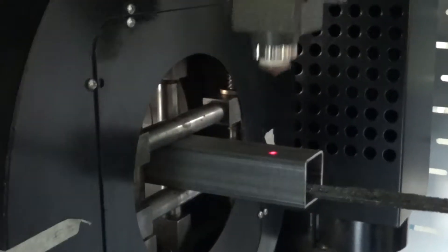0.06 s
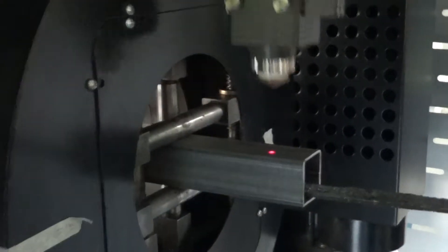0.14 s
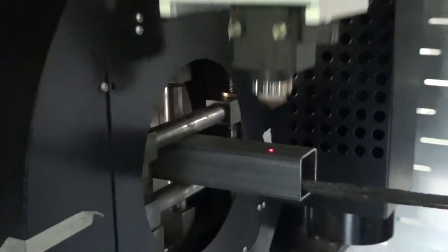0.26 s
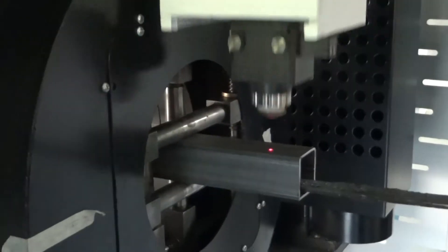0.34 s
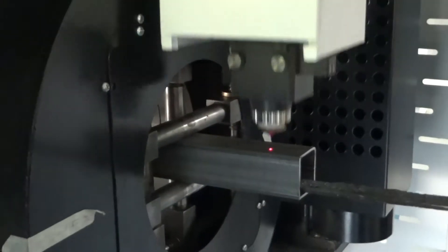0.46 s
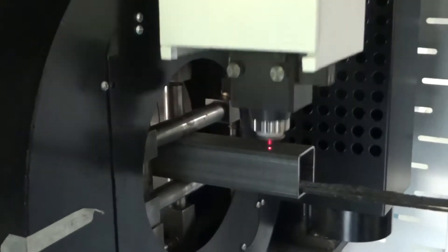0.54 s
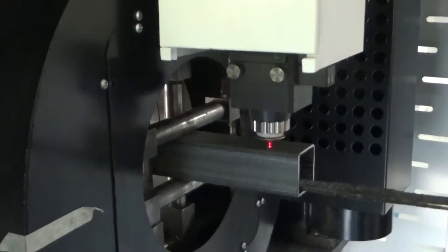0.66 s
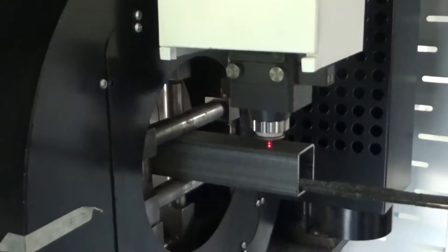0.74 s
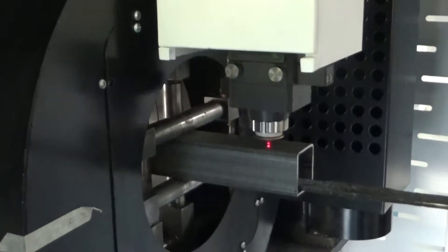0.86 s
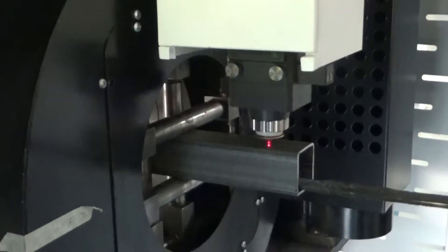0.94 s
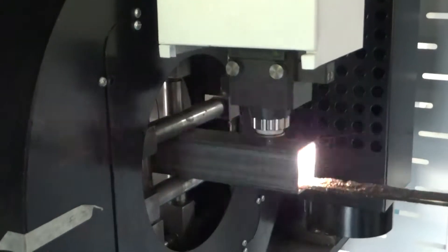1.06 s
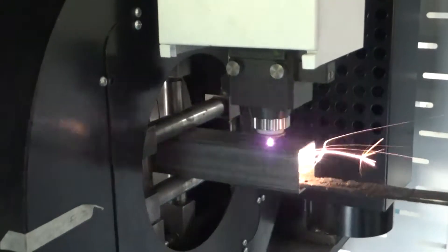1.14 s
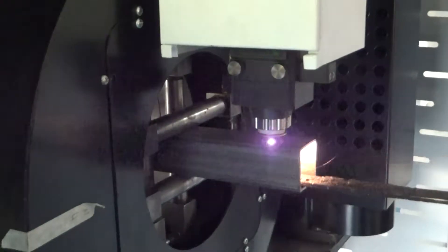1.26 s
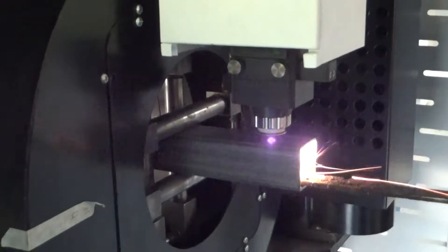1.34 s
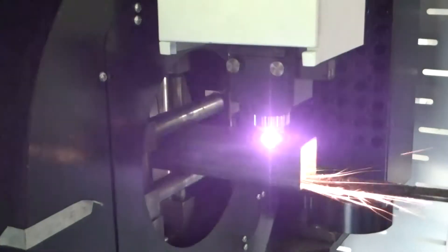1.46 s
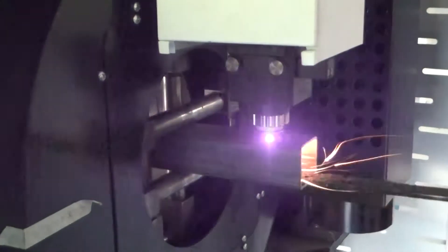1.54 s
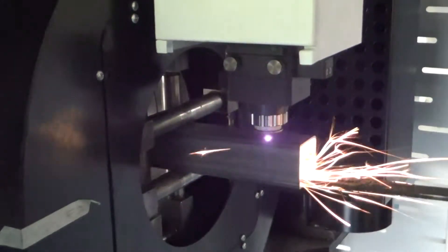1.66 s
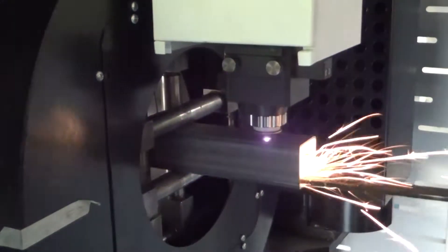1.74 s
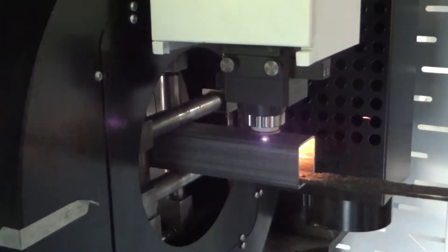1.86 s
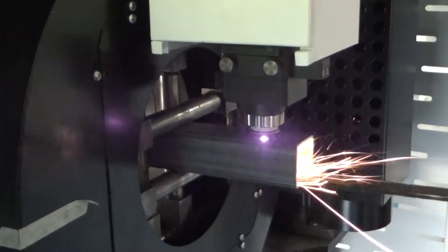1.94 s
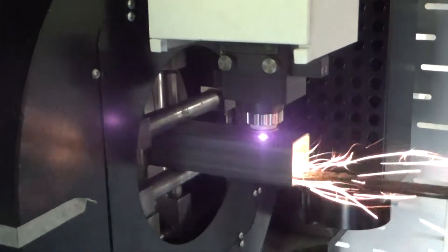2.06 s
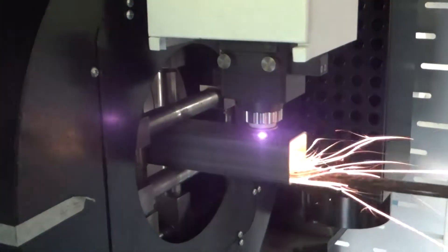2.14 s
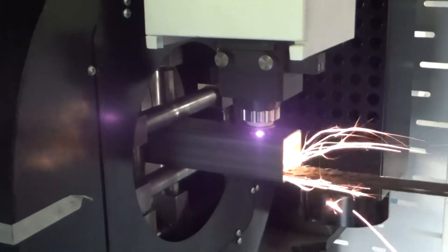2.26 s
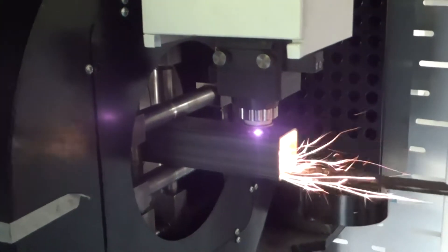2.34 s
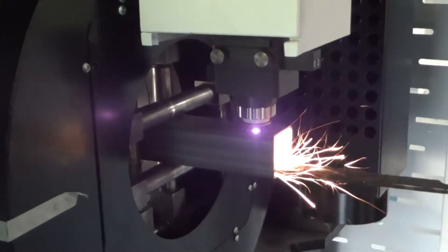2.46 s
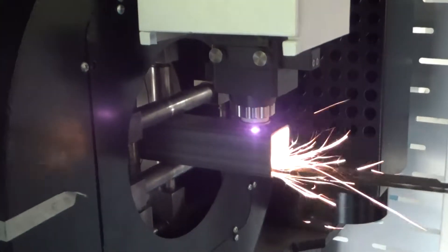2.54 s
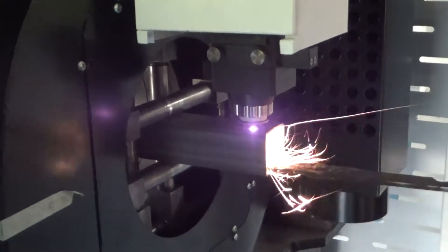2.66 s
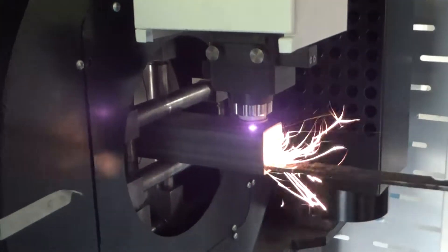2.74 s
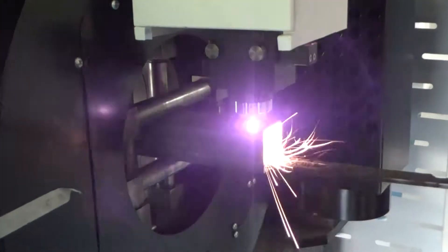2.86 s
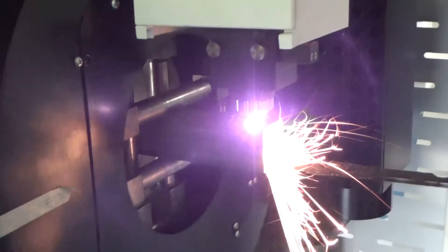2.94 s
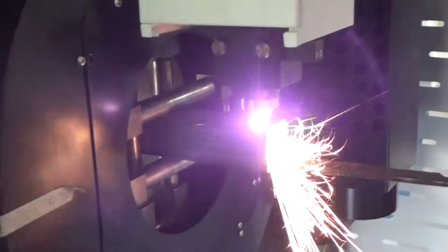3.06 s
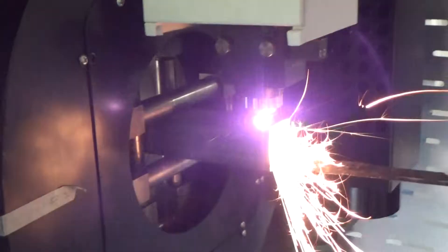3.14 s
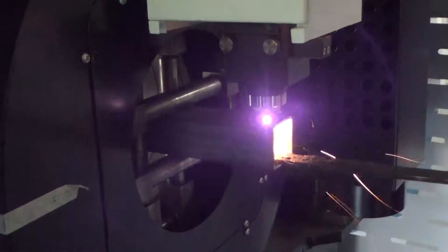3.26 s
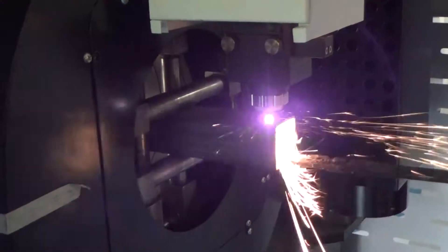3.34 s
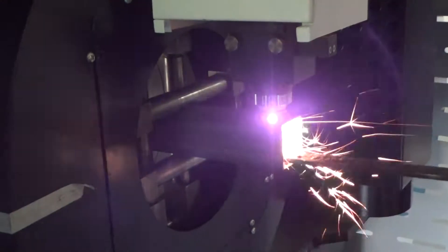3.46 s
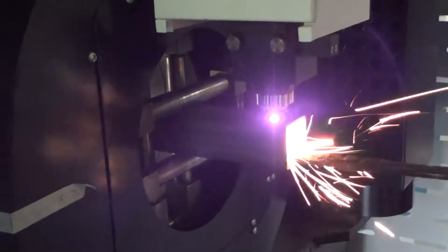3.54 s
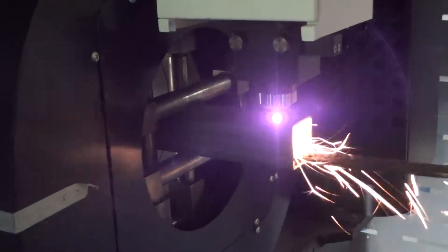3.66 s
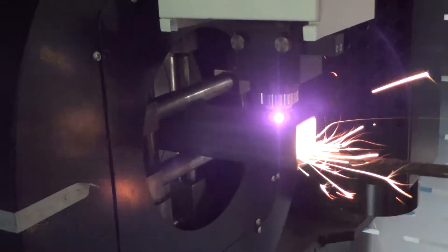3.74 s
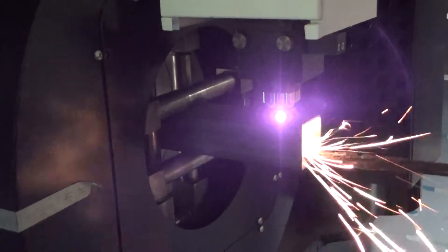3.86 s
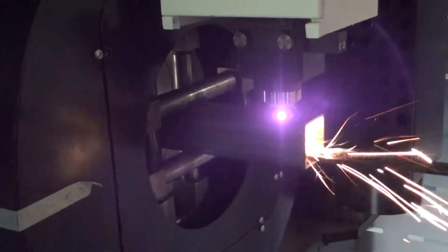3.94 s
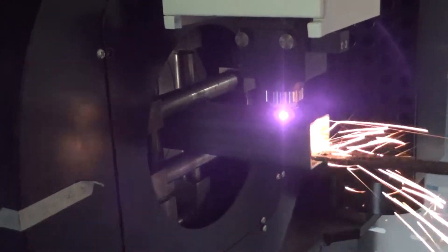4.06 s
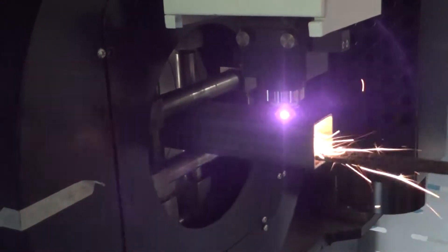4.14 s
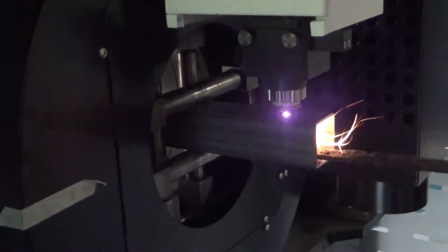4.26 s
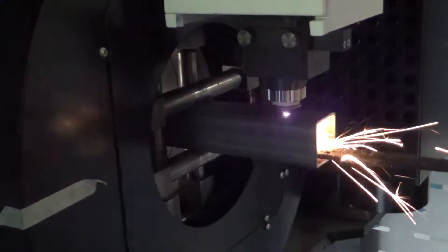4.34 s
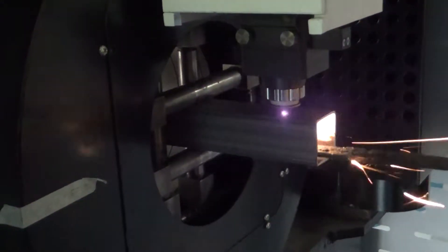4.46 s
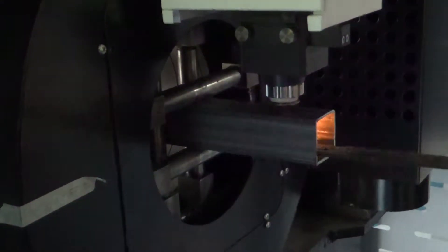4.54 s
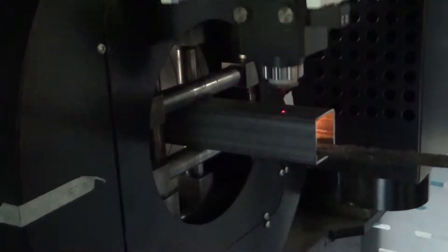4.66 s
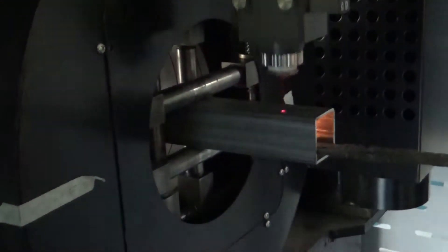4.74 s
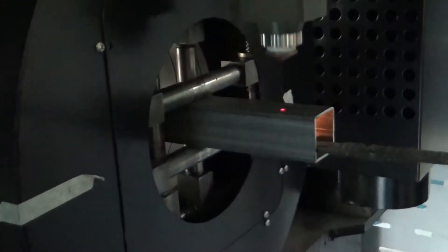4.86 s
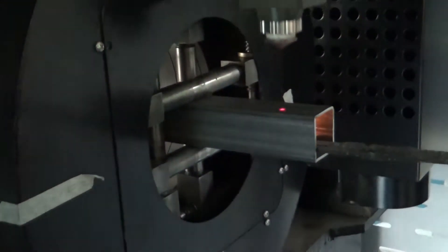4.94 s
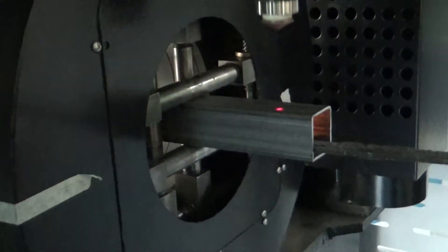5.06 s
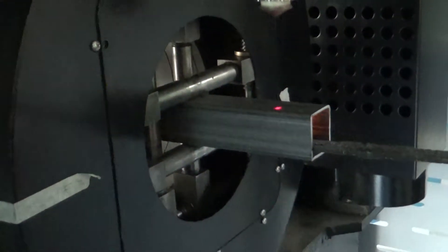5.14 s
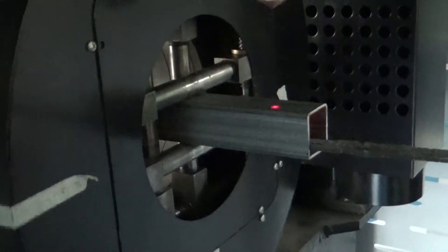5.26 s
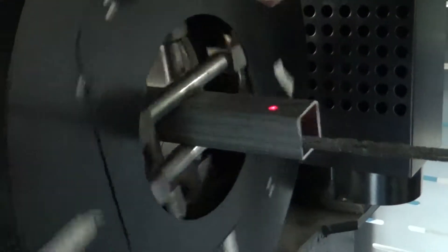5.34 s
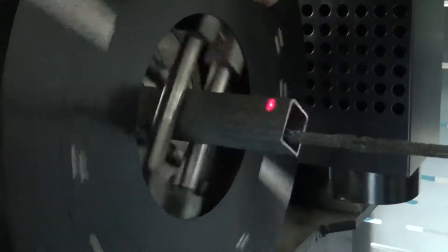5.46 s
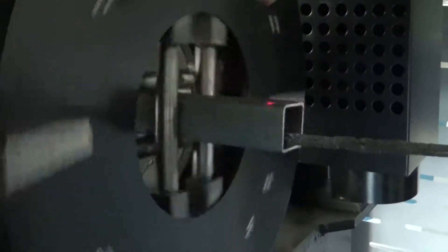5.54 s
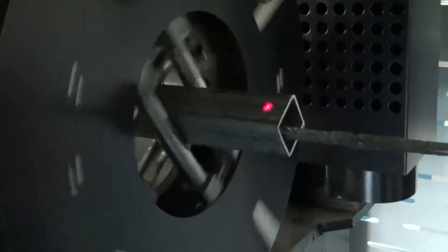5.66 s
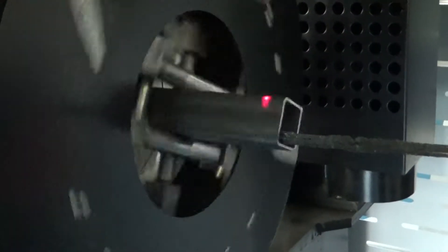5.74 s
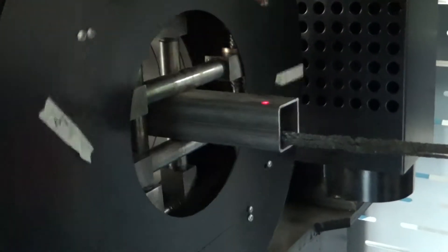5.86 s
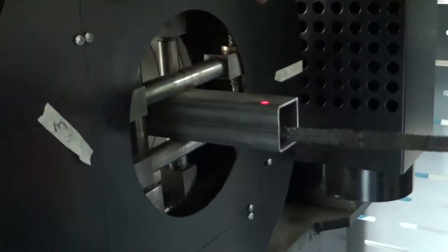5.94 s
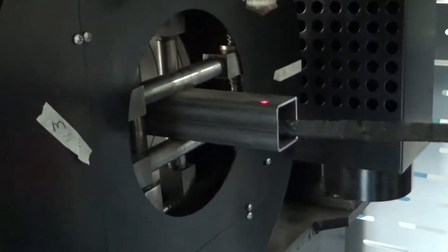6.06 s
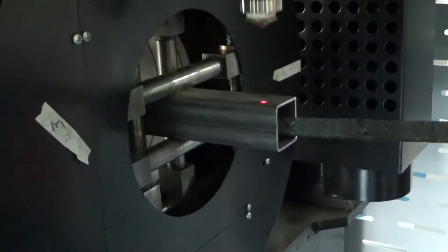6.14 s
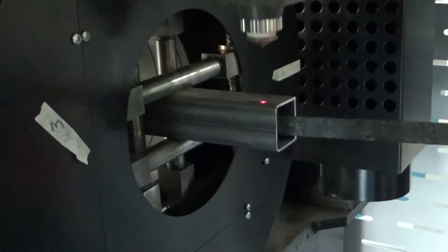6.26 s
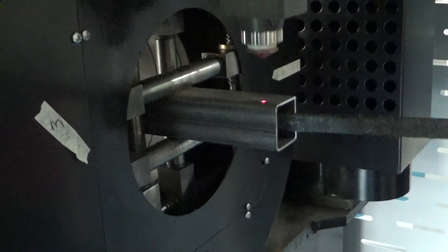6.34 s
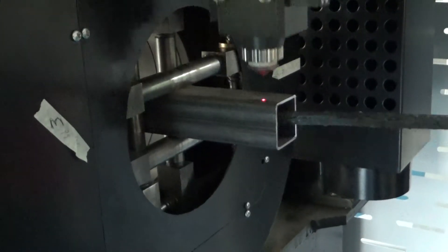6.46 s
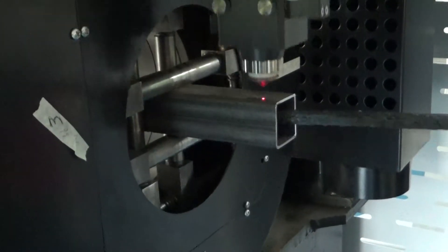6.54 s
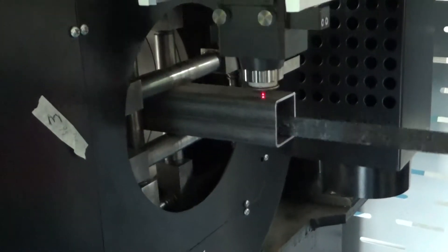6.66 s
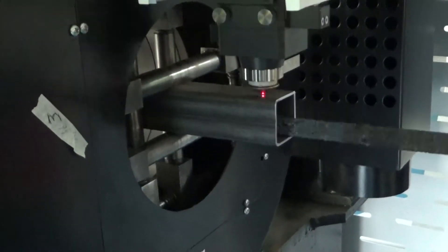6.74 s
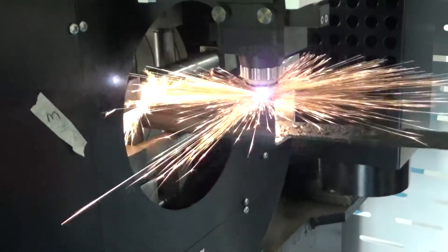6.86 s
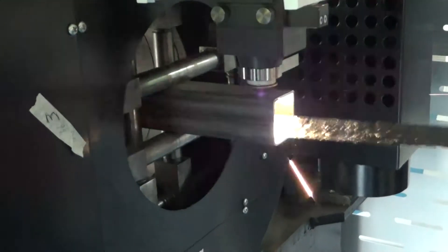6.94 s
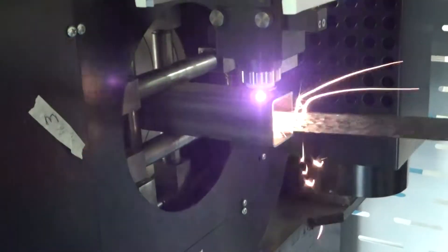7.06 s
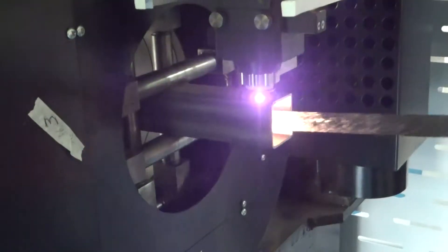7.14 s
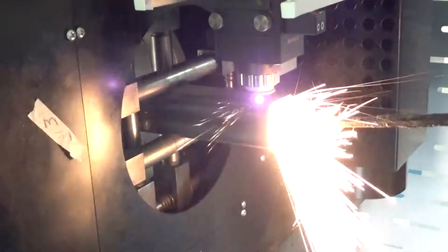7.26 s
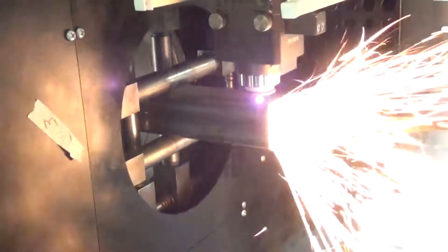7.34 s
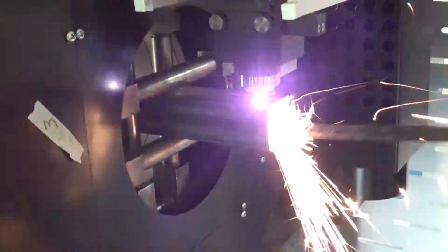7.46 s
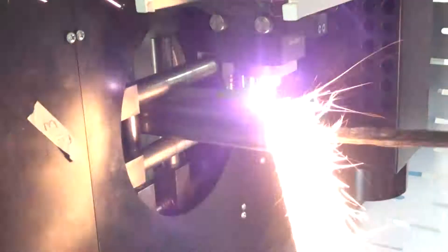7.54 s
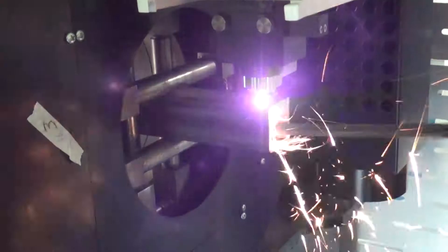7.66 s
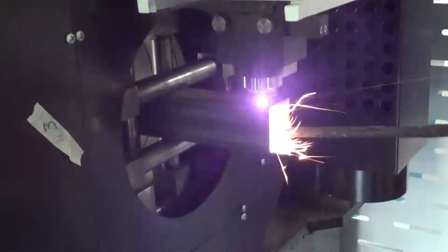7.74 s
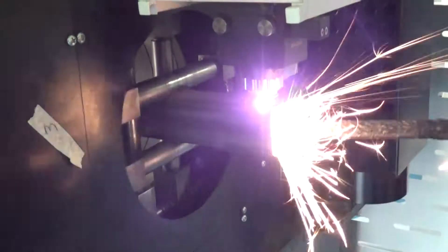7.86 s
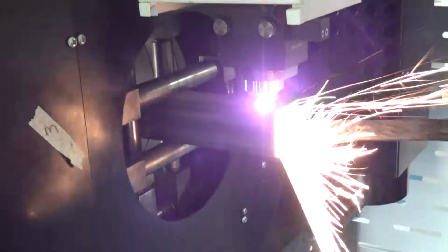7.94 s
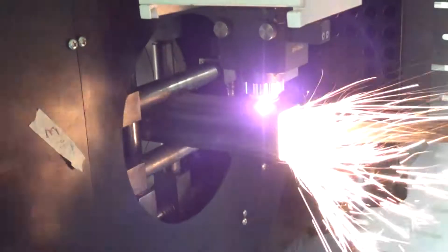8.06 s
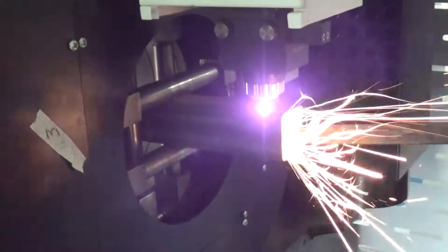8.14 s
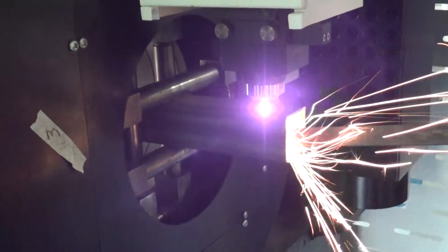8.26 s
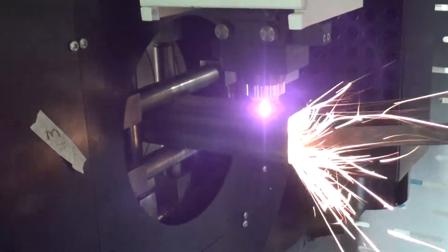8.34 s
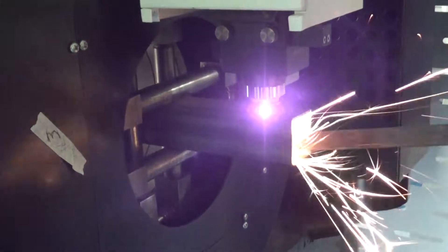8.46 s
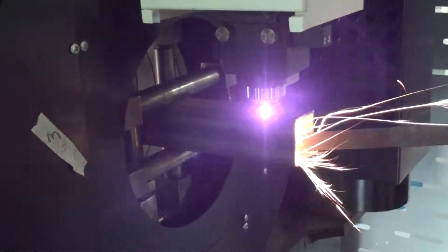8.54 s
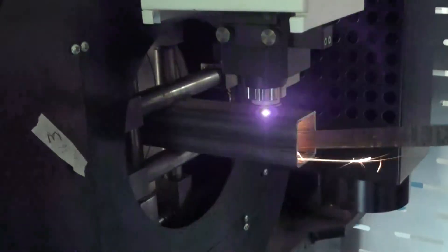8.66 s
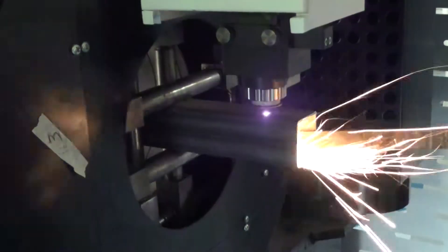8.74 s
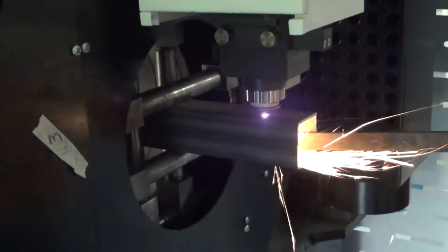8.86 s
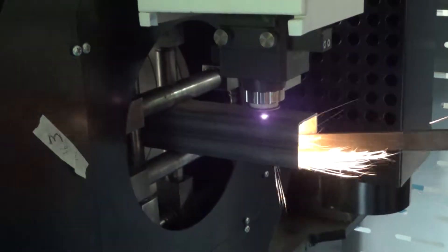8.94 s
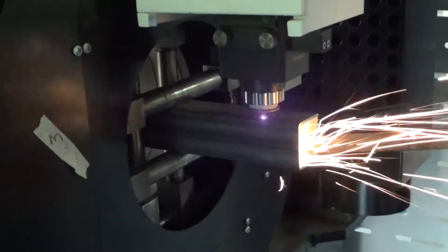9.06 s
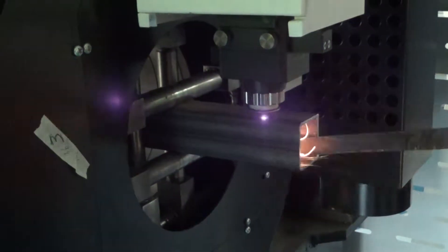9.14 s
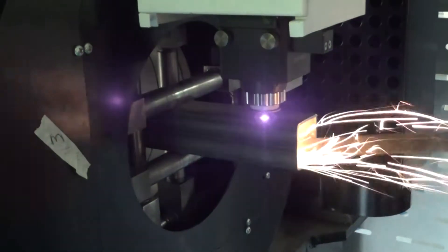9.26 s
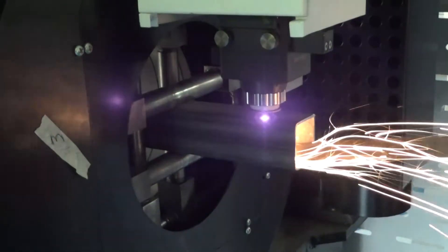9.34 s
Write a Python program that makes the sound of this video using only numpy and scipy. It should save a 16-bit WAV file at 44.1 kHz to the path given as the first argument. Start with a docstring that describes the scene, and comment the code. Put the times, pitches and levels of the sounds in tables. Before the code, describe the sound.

A laser cutter hisses loudly and brightly on steel tube, pauses as gas bleeds down and the chuck clanks round, then resumes its fierce hiss.

```python
"""Compressed air blows off in a roaring factory hall, then a laser starts to cut a square steel tube.
Cutting gas hisses from the nozzle and rushes through the tube; the pulsed beam adds a thin whine.
The head lifts, the gas bleeds away, the chuck turns the tube with a clank and pings, and the next cut starts.
Hisses are coloured noise, motors and whine are sine waves, pings are ringing filters.
The recorder's gain control pushes the hall far down under the hiss and lets it only partly back in the pause."""
import sys
import numpy as np
from scipy import signal
from scipy.fft import rfft, irfft, next_fast_len
from scipy.io import wavfile
from scipy.ndimage import uniform_filter1d

SR = 44100
rng = np.random.default_rng(int(sys.argv[2]) if len(sys.argv) > 2 else 0)


def pcm_store(signal):
    """Save signal as 16-bit PCM."""
    levels = np.round(np.clip(np.atleast_2d(signal), -1, 1) * 32767)
    wavfile.write(sys.argv[1], SR, levels.astype(np.int16).T)


N = 414540
TIME = np.arange(N) / SR  # seconds
FREQS = np.maximum(np.fft.rfftfreq(next_fast_len(N, True), 1 / SR), 1)  # Hz, kept above zero

# stereo width of the nearby sounds: pitch_hz [Hz], side_minus_mid_db [dB]
JET_WIDTH = [(500, -22), (1000, -9.5), (1600, -53), (2700, -34), (4500, -19), (7500, -14), (9500, -17.5),
             (12000, -38), (15000, -68)]
# their lean to one side: pitch_hz [Hz], left_minus_right_db [dB]
JET_LEAN = [(600, -0.29), (4500, 0.17), (7000, -1), (10000, 0.056)]
NEAR = (JET_WIDTH, JET_LEAN)
# relative spectrum of rolling and ticking parts: pitch_hz [Hz], level_db [dB per Hz]
ROLLING = [(1500, -48), (3200, -8), (5500, -5), (7200, -4), (8000, 5), (10000, 2), (12000, -9),
           (16000, -22)]
# the cuts: valve_opens_s [s], beam_fires_s [s], beam_stops_s [s], valve_shuts_s [s]
CUTS = [(0.66, 1.15, 3.9, 4.86), (6.728, 6.95, 9.5, 9.9)]


def from_db(db):
    """Turns decibels into a gain."""
    return 10 ** (np.asarray(db) / 20)


def rms_one(x):
    """Scales to an average power of one."""
    return x / np.sqrt(np.mean(x ** 2) + 1e-20)


def ramp(start_s, length_s):
    """Rises in a straight line from 0 to 1."""
    return np.clip((TIME - start_s) / length_s, 0, 1)


def swell(middle_s, length_s):
    """A rounded rise and fall of height 1."""
    return np.cos(np.pi * np.clip((TIME - middle_s) / length_s, -0.5, 0.5))


def since(moment_s):
    """Seconds gone by since a moment, 0 before it."""
    return np.maximum(TIME - moment_s, 0)


def drift(rate_hz):
    """Slow random wandering with a spread of 1: smoothed noise, drawn at every 40th sample."""
    pole = np.exp(-2 * np.pi * rate_hz * 40 / SR)
    steps = rng.standard_normal(N // 40 + 2002)
    smooth = signal.lfilter([1], [1, -2 * pole, pole * pole], steps)
    slow = rms_one(smooth[2000:])  # skip the filter's start
    return np.interp(np.arange(N) / 40, np.arange(len(slow)), slow)


def colour(points):
    """Gain at every frequency, joined up from points of pitch (Hz) and level (dB)."""
    pitch_hz, level_db = np.transpose(points)
    return from_db(np.interp(np.log(FREQS), np.log(pitch_hz), level_db))


def resonances(modes):
    """Gain at every frequency of resonances that each carry their own power."""
    power = 0
    for pitch_hz, width_hz, level_db in modes:
        shape = 1 / np.hypot(1, (FREQS - pitch_hz ** 2 / FREQS) / width_hz)
        power = power + (from_db(level_db) * rms_one(shape)) ** 2
    return np.sqrt(power)


def reflections():
    """Echoes from the steel panels leave fixed peaks and dips along the spectrum, with a spread of 1."""
    grid_hz = np.arange(0, SR, 45)
    return rms_one(np.interp(FREQS, grid_hz, rng.standard_normal(len(grid_hz))))


def noise(gain, place):
    """Stereo noise of a given colour, width and lean; its level is roughly that of the gain."""
    width, lean = place
    mid, side = rfft(rng.standard_normal((2, next_fast_len(N, True))))
    side = side * colour(width)
    tilt = np.sqrt(colour(lean))
    left_right = np.array([(mid + side) * tilt, (mid - side) / tilt])
    return irfft(left_right * gain)[:, :N]


def hiss(spectrum, place, ripple_db=1.5):
    """Noise of a level near one with a broad spectrum, rippled by reflections."""
    return noise(rms_one(colour(spectrum) * from_db(ripple_db * reflections())), place)


def factory():
    """Extractor fans and motors fill the hall; air blows off and the slides roll nearby."""
    # stereo width of hall and air: pitch_hz [Hz], side_minus_mid_db [dB]
    hall_width = [(100, -44), (200, -31), (400, -12.5), (700, -14.5), (1000, -5), (2000, -16.5), (5000, -1),
                  (10000, -20)]
    air_width = [(70, -24), (150, -2), (350, -2.5), (1000, -1), (2000, -6.5), (6000, -9), (10000, -13),
                 (13000, -38)]
    # their lean: pitch_hz [Hz], left_minus_right_db [dB]
    hall_lean = [(500, 0.016), (1200, 0.98), (4000, 1), (7000, 0)]
    air_lean = [(80, -6.5), (500, -3), (1200, 1), (4200, 1.7), (9000, -0.5)]
    # relative spectra of the roar and the air: pitch_hz [Hz], level_db [dB per Hz]
    hall_spectrum = [(20, -13), (50, -10.5), (100, -11), (140, -3.5), (210, 2), (300, -2), (480, -2.5),
                     (750, -3.5), (1200, -6), (1700, -9), (2600, -16.5), (5000, -24.5), (9000, -19.5),
                     (16000, -42)]
    air_spectrum = [(30, -1.5), (70, 8.5), (150, 9.5), (480, 11.5), (800, 3), (1800, 2.5), (2800, -1),
                    (3900, 2), (5300, -1.5), (7500, 0), (9000, 0), (11000, -7.5), (13500, -14),
                    (16000, -21)]
    # droning resonances of the hall: pitch_hz [Hz], width_hz [Hz], level_db [dB]
    hall_drones = [(78.6, 5, -59), (141, 29, -49.5), (201, 11, -48), (263, 19, -49), (383, 29, -47.5),
                   (523, 10, -55), (818, 13, -60), (3070, 110, -52)]
    # steady lines of fans and motors: pitch_hz [Hz], level_db [dB]
    motor_lines = [(47.7, -54), (228.3, -47), (343, -48.5), (476.4, -50), (719.3, -62), (939, -57),
                   (1043.6, -54.5)]
    # runs of the chuck and slides: middle_s [s], length_s [s], level_db [dB]
    slide_runs = [(5.9, 0.73, -40.5), (6.302, 0.2, -49.0), (6.695, 0.27, -37.0)]

    far = (hall_width, hall_lean)
    roar = hiss(hall_spectrum, far) * from_db(-34.5 + 1.1 * drift(8.4))
    drones = noise(resonances(hall_drones), far)
    motors = 0
    for pitch_hz, level_db in motor_lines:
        level = np.sqrt(2) * from_db(level_db + 2.0 * drift(1.0))
        motors = motors + level * np.sin(2 * np.pi * pitch_hz * TIME + drift(1))

    # the air grows a little until it is shut, then dies away (dB per second)
    air_shuts_s, grows_db_per_s, falls_db_per_s = 0.56, 3.5, 56
    air_db = -32.5 + grows_db_per_s * np.minimum(TIME, air_shuts_s) - falls_db_per_s * since(air_shuts_s)
    air = hiss(air_spectrum, (air_width, air_lean), ripple_db=2.5) * from_db(air_db)

    running = sum(from_db(level_db) * swell(middle_s, length_s) for middle_s, length_s, level_db in slide_runs)
    rattle = from_db(3.5 * drift(34))
    slides = hiss(ROLLING, NEAR, ripple_db=5.0) * running * rattle
    return roar + motors + drones + air + slides


def squeals(table, wander_hz):
    """Moving parts sing for a while; all tones of a table share one wandering of pitch."""
    wander = wander_hz * drift(62)
    total = 0
    for middle_s, length_s, pitch_hz, level_db in table:
        tone = np.sin(2 * np.pi * np.cumsum(pitch_hz + wander) / SR)
        total = total + np.sqrt(2) * from_db(level_db) * swell(middle_s, length_s) * tone
    return total


def drives():
    """The drives squeal briefly and motors hum for a while, each as an unsteady sine wave."""
    # short squeals: middle_s [s], length_s [s], pitch_hz [Hz], level_db [dB]
    squeal_tones = [(5.548, 0.079, 2950, -33), (5.72, 0.13, 6230, -43), (6.2, 0.6, 3130, -56),
                    (6.68, 0.13, 8000, -39), (6.69, .1, 10800, -48)]
    # motor hums: middle_s [s], length_s [s], pitch_hz [Hz], level_db [dB]
    hum_tones = [(.8, 1.3, 138.7, -43.5), (2.0, 7.5, 80.9, -50), (6.2, 2.6, 80.7, -53.5),
                 (5.95, 1.5, 192.8, -47), (6.78, 0.15, 730, -39), (9.0, 1.8, 200.3, -45)]
    return squeals(squeal_tones, wander_hz=27.2) + squeals(hum_tones, wander_hz=8.1)


def pings():
    """Each light touch in the chuck ticks and sets the steel's modes ringing with strengths of their own."""
    # touches: start_s [s], level_db [dB]
    touches = [(5.360, -22), (5.425, -18), (5.655, -32), (5.685, -25), (5.8676, -18.5), (5.929, -27),
               (5.955, -30), (5.964, -37), (6.009, -35)]
    # ringing modes of the steel: pitch_hz [Hz], relative_db [dB], time_to_fall_60_db_s [s]
    steel_modes = [(6250, -13, 0.26), (7800, -11, 0.2), (11470, 0.5, 0.09), (11560, -11, 0.16),
                   (13200, -24, .17), (14520, -17, 0.2), (14680, -24, .2)]
    start_s, level_db = np.transpose(touches)
    at = (start_s * SR).astype(int)
    ringing, clicks = np.zeros(N), np.zeros(N)
    for pitch_hz, relative_db, fall_s in steel_modes:
        scatter_db = 1.0 * rng.standard_normal(len(at))
        clicks[at] = from_db(level_db + relative_db + scatter_db)
        pole = np.exp(-np.log(1000) / (fall_s * SR))
        angle = 2 * np.pi * pitch_hz / SR
        feedback = [1, -2 * pole * np.cos(angle), pole * pole]
        ringing += signal.lfilter([0, np.sin(angle)], feedback, clicks + 1e-18)
    clicks[at] = from_db(level_db - 10)
    tick_s = 0.0033  # time for a tick to fade to about a third
    ticks = signal.lfilter([1], [1, -np.exp(-1 / (tick_s * SR))], clicks + 1e-18)
    return ringing + ticks * hiss(ROLLING, NEAR)


def knocks():
    """Jaws, head and gas valve knock: a sharp crack, then the jaws rattle on in their modes."""
    # knocks: start_s [s], crack_db [dB], rattling_tail_db [dB]
    knock_times = [(0.545, -24.5, -46), (5.523, -17.5, -27), (5.771, -12.5, -21), (5.799, -17, -35),
                   (6.049, -58, -36), (6.220, -35, -53), (6.308, -36, -47), (6.488, -30, -40),
                   (6.623, -30, -44), (6.645, -31, -45), (6.733, -21, -36)]
    # relative spectrum of the crack: pitch_hz [Hz], level_db [dB per Hz]
    crack_spectrum = [(800, -2), (2000, -1), (2600, -6), (4200, 2), (4900, 5), (5600, -3), (7000, 6),
                      (9000, -1), (10500, 2), (12000, -38), (16000, -36)]
    # modes of the jaws and their housing: pitch_hz [Hz], width_hz [Hz], relative_db [dB]
    jaw_modes = [(2360, 40, -6), (2670, 23, -7), (3200, 120, -5), (3720, 110, -5), (4020, 85, -7),
                 (4740, 55, -3.5), (5740, 110, -4.5), (7070, 210, -1), (7450, 200, -5), (8100, 80, -7),
                 (8500, 150, -17), (8960, 80, -2), (10300, 200, -8)]
    crack_fall_s, tail_fall_s = 0.021, 0.32  # time to fall by 60 dB
    build_s = 0.008  # the rattle takes a moment to build
    crack, tail = np.zeros((2, N))
    for start_s, crack_db, tail_db in knock_times:
        at = int(start_s * SR)
        age = TIME[:min(SR, N - at)]
        here = slice(at, at + len(age))
        crack[here] += from_db(crack_db - 60 * age / crack_fall_s)
        tail[here] += from_db(tail_db - 60 * age / tail_fall_s) * (1 - np.exp(-age / build_s))
    rattle = noise(rms_one(resonances(jaw_modes)), NEAR) * from_db(0.5 * drift(60))
    return crack * hiss(crack_spectrum, NEAR) + tail * rattle


def gas_flow():
    """Strength of the jet: pressure builds when the valve opens and bleeds away when it shuts."""
    valve_s, fill_s = 0.014, 0.062  # opening time of the valve; pace of filling to working pressure
    bleed_db_per_s, empty_db_per_s = 35, 45.0
    empty_s = 0.89  # this long after shutting the hose runs empty and the jet dies faster
    flow = 0
    for opens_s, _, _, shuts_s in CUTS:
        filling_db = -18 * np.exp(-since(opens_s) / fill_s)  # starts weak
        bleeding_db = bleed_db_per_s * since(shuts_s) + empty_db_per_s * since(shuts_s + empty_s)
        flow = flow + ramp(opens_s, valve_s) * from_db(-4.5 + filling_db - bleeding_db)
    return flow


def gap_whoosh():
    """Turbulence rings under the lifting nozzle; its pitch falls as the gap grows, then the jet splashes wide."""
    # the spreading jet splashing on the whole tube: pitch_hz [Hz], width_hz [Hz], level_db [dB before gas flow]
    splash_modes = [(920, 580, -18)]
    lift_s, fade_s, splash_delay_s = 4.63, 0.15, 0.23
    start_s, lowered_s = lift_s - fade_s, CUTS[1][0]
    first_hz, last_hz, sink_s = 11100, 600, 0.22
    centre_hz = last_hz + (first_hz - last_hz) * np.exp(-since(lift_s) / sink_s)
    # loudest as the pitch passes that of the tube's bore
    bore_hz, bore_octaves, bore_boost_db = 4200, 0.84, 13
    octaves_away = np.log2(centre_hz / bore_hz)
    level_db = -16.5 + bore_boost_db * np.exp(-(octaves_away / bore_octaves) ** 2)

    relative_width = 0.92  # of the band, against its centre
    source, whoosh, state = noise(0.62, NEAR), np.zeros((2, N)), np.zeros((2, 2))
    # a band filter, retuned every 128 samples
    for i in range(int(start_s * SR), int(lowered_s * SR), 128):
        block = slice(i, i + 128)
        angle = 2 * np.pi * centre_hz[i] / SR
        damping = np.sin(angle) * relative_width / 2
        feed = np.sqrt(damping * (1 + damping)) * np.array([1, 0, -1])
        feedback = [1 + damping, -2 * np.cos(angle), 1 - damping]
        whoosh[:, block], state = signal.lfilter(feed, feedback, source[:, block], zi=state)
    splash = noise(resonances(splash_modes), NEAR) * ramp(lift_s + splash_delay_s, fade_s)
    return whoosh * from_db(level_db) * ramp(start_s, fade_s) + splash * (TIME < lowered_s)


def beam_whine():
    """Each laser pulse puffs out vapour; the unsteady melt makes the harmonics waver."""
    # first to third harmonic: level_db [dB before gas flow]
    harmonics_db = [-28.0, -19.0, -29.5]
    # flares of the second harmonic: middle_s [s], length_s [s], rise_db [dB]
    flares = [(2.99, 0.6, 8.0), (7.85, 0.33, 3), (9.3, 0.33, 14)]
    pulse_hz, fade_s = 5000, 0.13
    firing = sum(ramp(fires_s, fade_s) - ramp(stops_s, fade_s) for _, fires_s, stops_s, _ in CUTS)
    flare_db = sum(rise_db * swell(middle_s, length_s) for middle_s, length_s, rise_db in flares)
    whine = 0
    for number, level_db in enumerate(harmonics_db, start=1):
        if number == 2:
            level_db = level_db + flare_db
        phase = 2 * np.pi * number * pulse_hz * TIME + 0.4 * drift(16)
        whine = whine + from_db(level_db + 3.5 * drift(9.9)) * np.sin(phase)
    return np.sqrt(2) * whine * firing


def cutting_jet():
    """The nozzle's hiss, the slot's ring, the tube's rush and air modes and the whine scale with the gas flow."""
    # relative spectra of nozzle and rush: pitch_hz [Hz], level_db [dB per Hz]
    nozzle_spectrum = [(400, -36), (1000, -24), (1800, -21), (3000, -16), (4500, -12), (6000, -9.5),
                       (7200, -4.5), (8600, 0), (10700, 0), (11800, -6), (13000, -6.5), (14500, -10.5),
                       (15700, -16)]
    rush_spectrum = [(600, -25), (1200, -17.5), (2000, -5.5), (2900, -1), (3700, -3), (5000, -6.5),
                     (7000, -5), (10000, -10)]
    # air modes of the tube: pitch_hz [Hz], width_hz [Hz], relative_db [dB]
    tube_modes = [(569.5, 11.6, -33.5), (679, 38, -35), (1250, 200, -34.5), (1370, 50, -48),
                  (3130, 230, -26.5)]
    # gas passing through the cut into the tube, first and second cut: time_s [s], against_usual_db [dB]
    first_kerf = [(0.7, -2.5), (1.1, 2.5), (1.3, -0.5), (1.7, -5), (2.15, 3.5), (3.3, -4), (4.4, 4),
                  (4.72, -7.0), (5.6, 8)]
    second_kerf = [(6.75, 2.5), (6.95, -1.5), (7.7, -2.5), (8.0, 6), (8.7, 2.5), (9.2, 6.5)]
    # the slot catches the jet and rings up: middle_s [s], length_s [s], rise_db [dB]
    slot_swells = [(1.3, 0.33, 7.5), (3.3, 0.99, 5.5), (4.105, 0.96, 6.5), (7.7, 0.77, 4.5)]
    # the lifting jet sweeps over the open cut, one swell: middle_s [s], length_s [s], rise_db [dB]
    lift_rush = (4.98, 0.52, 10.2)

    kerf_s, kerf_db = np.transpose(first_kerf + second_kerf)
    lift_middle_s, lift_length_s, lift_rise_db = lift_rush
    through_db = np.interp(TIME, kerf_s, kerf_db) + lift_rise_db * swell(lift_middle_s, lift_length_s)
    caught_db = sum(rise_db * swell(middle_s, length_s) for middle_s, length_s, rise_db in slot_swells)

    # the hiss flutters, and loses a share of what the slot gains
    nozzle_db = 1.0 * drift(26) + 0.23 * drift(2.1) - 0.1 * caught_db
    nozzle = hiss(nozzle_spectrum, NEAR) * from_db(nozzle_db)
    slot_band = rms_one(resonances([(9450, 2250, 0)]) ** 2)  # centre and width in Hz
    slot = noise(slot_band, NEAR) * from_db(-8 + caught_db + 2.0 * drift(19))
    # gas that goes through no longer hisses on the surface
    surface = (nozzle + slot) * from_db(-0.18 * through_db)

    rush = hiss(rush_spectrum, NEAR, ripple_db=2.3) * from_db(-19.5 + through_db + 2.0 * drift(5.2))
    # the air modes follow only a share of the swing in flow
    tube = noise(resonances(tube_modes), NEAR) * from_db(-1.0 + 0.35 * through_db + 0.5 * drift(0.67))
    whoosh = gap_whoosh() * from_db(1.0 * drift(22))
    return gas_flow() * (surface + rush + tube + whoosh + beam_whine())


def scene():
    """The cutter in its hall."""
    return factory() + drives() + pings() + knocks() + cutting_jet()


def gain_control(x):
    """Gain drops fast on loud sound, springs back to a held value and only creeps up beyond it."""
    target_db, boost_db, held_db = -16.5, 10.5, -3.5  # loudness aimed at, highest gain, held gain
    attack_s, release_s, creep_db_per_s = 0.0027, 0.2, 2.0
    size = 64  # samples between gain updates
    step_s = size / SR
    power = uniform_filter1d(np.mean(x, axis=0) ** 2, size=512)[::size]
    gain_db, track = boost_db, []
    for allowed_db in np.minimum(target_db - 10 * np.log10(power + 1e-12), boost_db):
        if allowed_db < gain_db:
            gain_db += (allowed_db - gain_db) * min(step_s / attack_s, 1)
        else:
            gain_db += step_s * (max(held_db - gain_db, 0) / release_s + creep_db_per_s)
        track.append(gain_db)
    return x * from_db(np.interp(TIME, TIME[::size], track))


def record(dry):
    """Gain control, then a steep cut of the treble above 15800 Hz."""
    steep_cut = signal.ellip(12, 0.1, 80, 15800, fs=SR, output="sos")
    return signal.sosfilt(steep_cut, gain_control(dry))


dry = scene()
out = record(dry)
pcm_store(out)
```